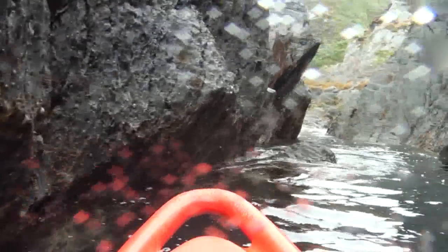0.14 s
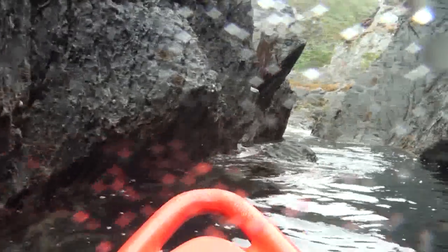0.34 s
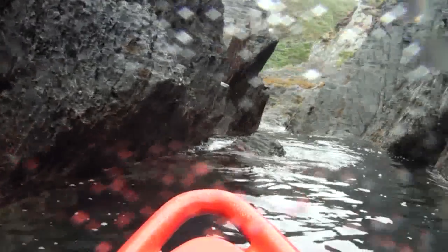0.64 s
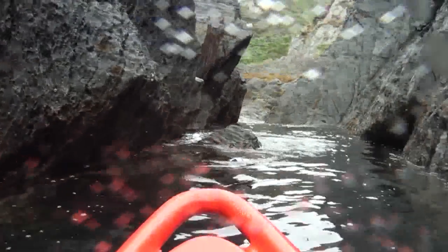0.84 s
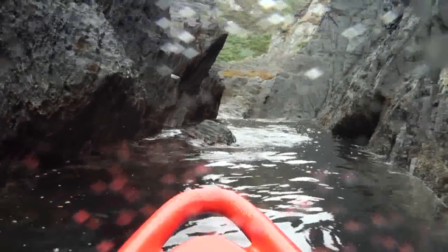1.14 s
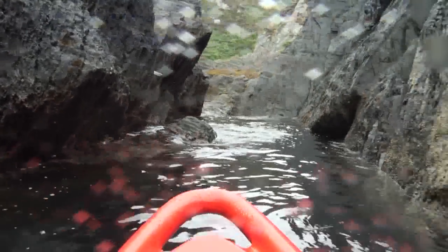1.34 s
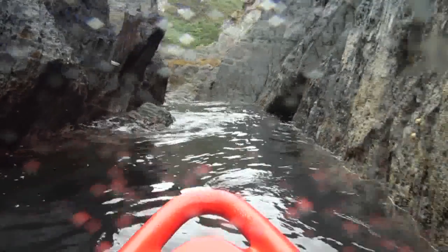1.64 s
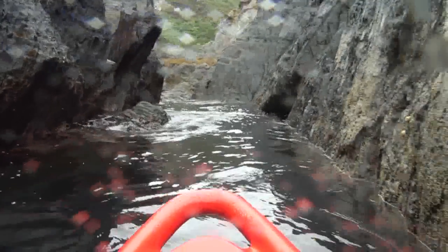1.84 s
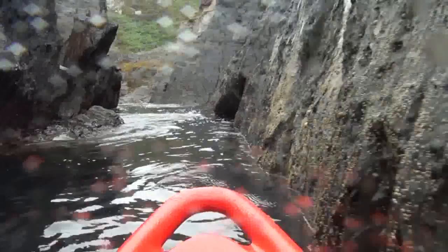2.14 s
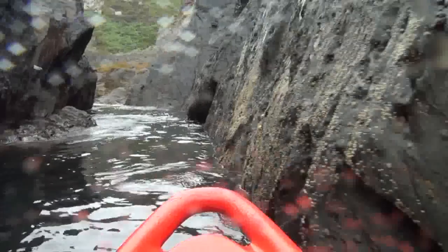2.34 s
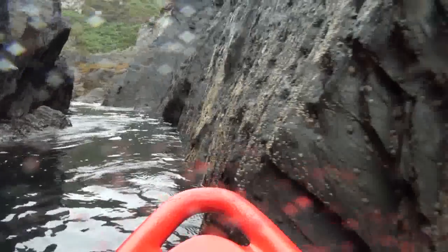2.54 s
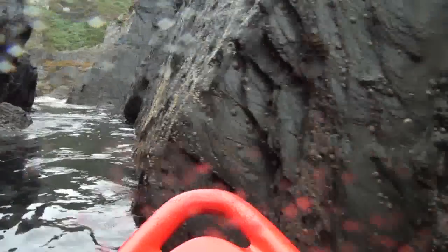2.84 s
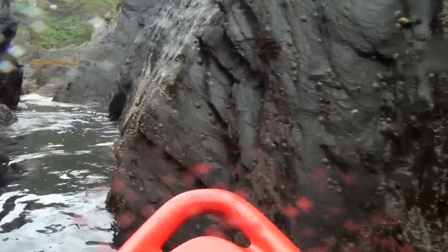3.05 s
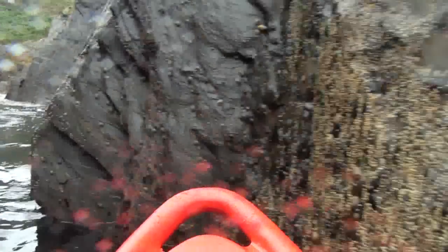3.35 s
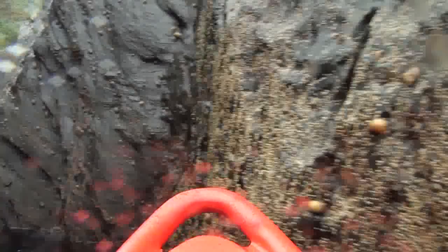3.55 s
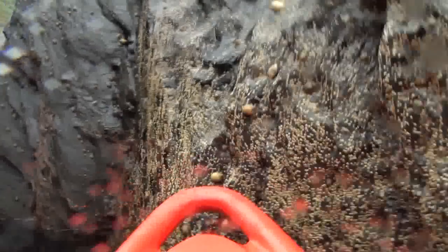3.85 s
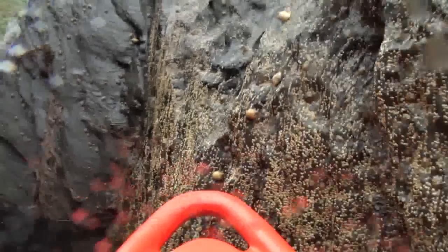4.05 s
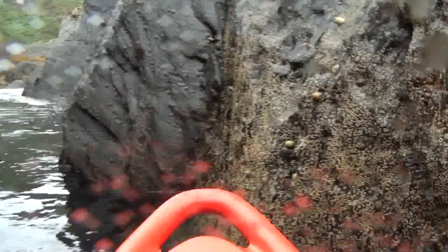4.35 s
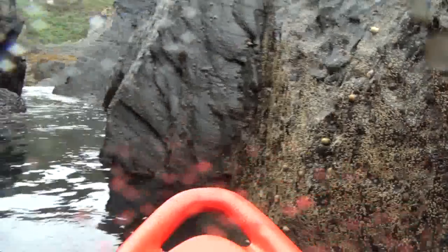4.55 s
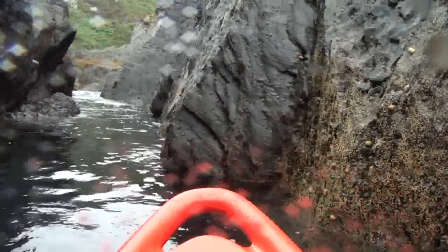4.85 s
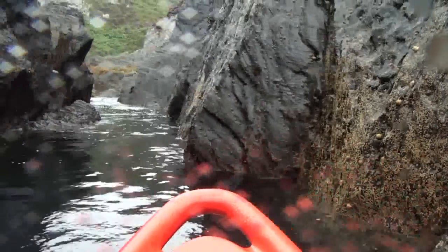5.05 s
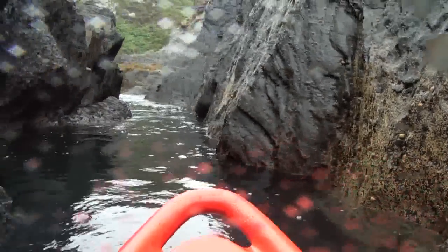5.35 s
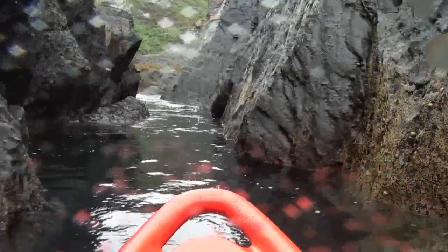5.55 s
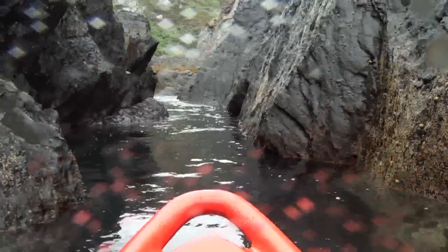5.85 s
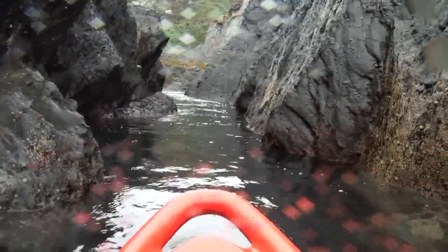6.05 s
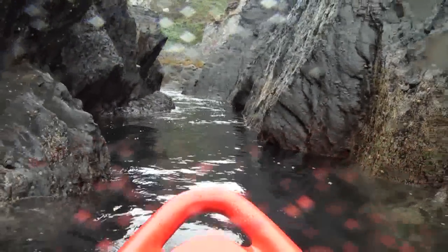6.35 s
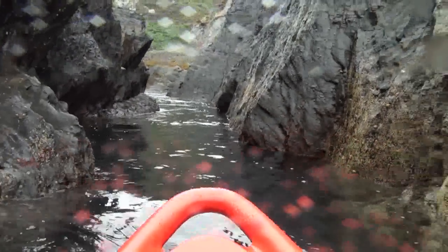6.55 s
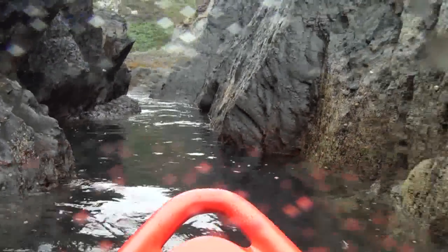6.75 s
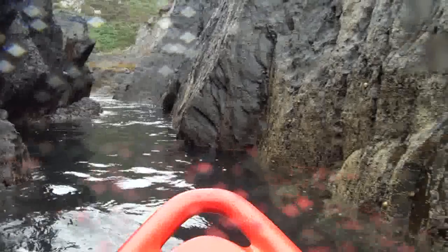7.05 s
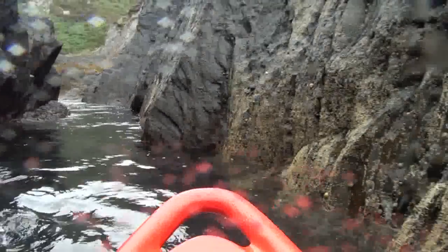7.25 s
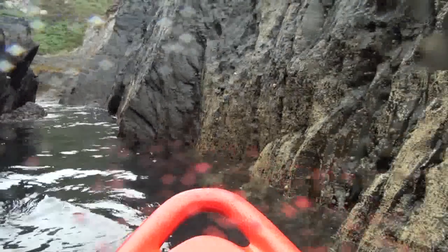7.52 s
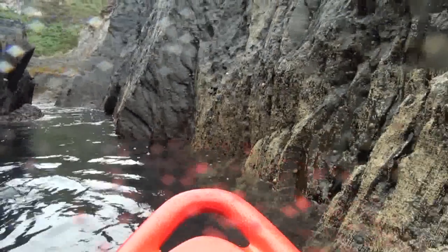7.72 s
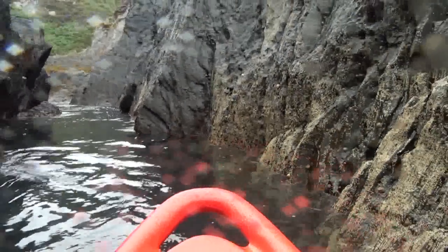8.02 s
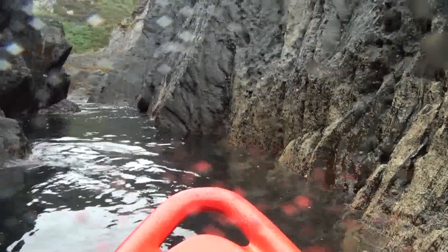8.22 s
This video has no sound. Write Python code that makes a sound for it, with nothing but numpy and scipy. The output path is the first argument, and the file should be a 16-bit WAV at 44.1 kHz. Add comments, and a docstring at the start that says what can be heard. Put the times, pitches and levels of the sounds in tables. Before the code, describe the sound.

Heard from a sealed case on the deck of a plastic kayak in a narrow rock gully, everything is close, dull and boxy, with faint hiss. It opens with churned water, a sharp drop and quick paddle knocks, fading by about 0.5 s into lapping. Light knocks and a small fizzing swash come near 1.3-1.6 s, then soft gurgles around 2 s and a few taps at 2.75-3.05 s. At 3.83 s the hull strikes rock: a loud deep boom, a surge, and a clatter of blunt knocks until 4.25 s. Bubbling gurgles and high plinks run to about 5 s, then ease. A flurry of hard, hollow paddle knocks rattles from 5.67 to 6.04 s. Water stays calm, with faint ticks, until a small gurgle near 7.8 s. From 8.06 s, water rushes up and the hull bumps rock with several low booms before the end.

```python
"""A plastic kayak drifts in a narrow rock gully, heard by two microphones in a sealed case on its deck.
It starts with churned water and paddle knocks, then shaped noise and gliding sines wash and gurgle.
Near 3.8 s rock hits with a deep hull boom and a surge: noise cracks and booms, fading sines ring.
Gurgles follow, a flurry of paddle knocks near 6 s, a calmer spell, then rock and hull booms after 8 s.
Drops tick on the case throughout; the case muffles everything and rings differently at each microphone."""
import sys
import numpy as np
from scipy import signal
from scipy.fft import rfft, irfft, next_fast_len
from scipy.io import wavfile
from scipy.ndimage import uniform_filter1d, map_coordinates

SR = 44100
rng = np.random.default_rng(int(sys.argv[2]) if len(sys.argv) > 2 else 0)


def store_pcm(level_fs):
    """Save levels as 16-bit WAV."""
    pcm = np.round(np.clip(level_fs, -1, 1) * 32767).astype(np.int16)
    wavfile.write(sys.argv[1], SR, np.atleast_2d(pcm).T)


N = 369554  # samples


def amp(db):
    """Turn decibels into gain."""
    return 10 ** (np.asarray(db) / 20)


def unit(x):
    """Scale x to an rms (average strength) of 1."""
    return x / np.sqrt(np.mean(x ** 2) + 1e-20)


def along(points, hz):
    """Read a value at each pitch from (Hz, value) points, joined on a log pitch axis."""
    point_hz, value = np.transpose(points)
    return np.interp(np.log(hz + 1), np.log(point_hz + 1), value)


def filtered(x, response):
    """Filter x with a response given as a function of frequency."""
    size = 2 * next_fast_len(N // 2 + SR // 4)  # spare room, so the tail does not wrap round
    spectrum = rfft(x, size) * response(np.fft.rfftfreq(size, 1 / SR))
    return irfft(spectrum, size)[..., :N]


def high_pass(hz, corner_hz):
    """A two-stage filter that lets through what lies above the corner."""
    return (1j * hz / (corner_hz + 1j * hz)) ** 2


def low_pass(hz, corner_hz):
    """A two-stage filter that lets through what lies below the corner."""
    return 1 / (1 + 1j * hz / corner_hz) ** 2


def causal(db):
    """A minimum-phase filter with these decibels: it answers as early as it can, never beforehand."""
    cepstrum = irfft(np.log(amp(db)))
    fold = np.r_[1, np.full(len(db) - 2, 2), 1]
    return np.exp(rfft(cepstrum[:len(db)] * fold, len(cepstrum)))


def modes(table, hz):
    """A sum of resonances, scaled to keep the power of white noise."""
    ring = sum(amp(db) * 1j * hz * width / (centre ** 2 - hz ** 2 + 1j * hz * width)
               for centre, width, db in table)
    return ring / np.sqrt(np.mean(abs(ring) ** 2))


def patchy(spectrum, patchy_db, hz_bins, frames):
    """Two noises of rms 1 whose strength varies together, in random patches of pitch and time."""
    noise = signal.stft(rng.standard_normal((2, N)), nperseg=512)[2]
    field = uniform_filter1d(rng.standard_normal(noise.shape[1:]), hz_bins, 0)
    field = unit(uniform_filter1d(field, frames, 1))
    pair = signal.istft(noise * amp(patchy_db * field), nperseg=512)[1][:, :N]
    closed = [(1, -120)] + spectrum + [(SR / 2, -120)]  # silent at both ends of the band
    return unit(filtered(pair, lambda hz: amp(along(closed, hz))))


def chirps(start, first_hz, last_hz, db, length):
    """Gliding sines with a quick swell and a slower fade; each path has its own phase."""
    out = np.zeros((2, N + SR))
    # the water surface is never still
    flutter = 1 + 0.38 * unit(uniform_filter1d(rng.standard_normal(N + SR), 70))
    phases = rng.uniform(0, 2 * np.pi, (len(start), 2))
    for s, first, last, level, life, phase in zip(start, first_hz, last_hz, db, length, phases):
        at = round(s * SR)
        u = np.arange(round(life * SR)) / (life * SR)  # 0 to 1 through the life
        turn = 2 * np.pi * life * (first * u + (last - first) * u * u / 2)
        swell = np.sin(np.pi * u ** 0.54) ** 0.81
        tone = swell * np.sin(turn + phase[:, None]) * flutter[at:][:len(u)]
        out[:, at:][:, :len(u)] += amp(level) * tone
    return out[:, :N]


def curves(rows):
    """Join the rows into one value per sample for each column after the time."""
    s, *columns = np.transpose(rows)
    return [np.interp(np.arange(N) / SR, s, column) for column in columns]


def levels_db():
    """Slosh, ripple, fizz and rumble levels: open water plus surges that rise, hold and fade."""
    # open water between surges: (time [s], ripple level [dB], fizz level [dB], rumble level [dB])
    open_water = [(0, -31.5, -26, -30), (.5, -36, -30.5, -46), (.88, -38, -31, -59.5),
                  (1.4, -34, -22, -45.5), (1.58, -37.5, -28, -49.5), (1.7, -40.5, -37, -57.5),
                  (2.3, -40.5, -35, -62), (2.7, -37.5, -32.5, -66), (2.86, -34.5, -28, -72),
                  (3.15, -37.5, -32, -61.5), (3.7, -39.5, -35.5, -43), (4.2, -36, -34, -47),
                  (4.55, -31, -25.5, -61), (4.9, -36, -25.5, -65), (5.2, -41.5, -37, -56),
                  (5.85, -42, -35.5, -57), (6.4, -47.5, -44, -54), (6.75, -42.5, -35.5, -62),
                  (6.88, -45, -27.5, -71), (7, -42, -39, -61.5), (7.5, -44, -34, -48),
                  (7.72, -43.5, -37.5, -60), (8.0, -32, -29.5, -62), (8.38, -29, -25, -40)]
    # surges churned up by a stroke or a bump:
    # (time [s], slosh level [dB], ripple level [dB], fizz level [dB], rumble level [dB])
    surges = [(0, -36, -23.5, -20.5, -43.5), (3.838, -25.5, -23.5, -47, -23.5), (5.9, -47.5, -38, -27, -76),
              (8.12, -41, -31.5, -32.5, -54)]
    # how fast a surge dies: slosh, ripple, fizz, rumble [dB per s]
    fade_rates = [37.7, 41.5, 40, 51]
    rise_s, hold_s = 0.085, 0.048
    ripple, fizz, rumble = curves(open_water)
    slosh = ripple - 7  # dB
    gains, t = amp([slosh, ripple, fizz, rumble]), np.arange(N) / SR
    for s, *peak_db in surges:
        fade_db = np.outer(fade_rates, np.maximum(t - s - rise_s - hold_s, 0))
        rise = np.clip((t - s) / rise_s, 0, 1)
        gains = np.hypot(gains, rise * amp(np.c_[peak_db] - fade_db))  # powers add
    return 20 * np.log10(gains)


def laps():
    """Slosh and ripple gains of wavelets lapping the hull, each a smooth swell."""
    # (time [s], slosh level [dB], ripple level [dB], length [s])
    wavelets = [(0.31, -46, -28, 0.075), (1.325, -45, -29.5, 0.072), (1.558, -39, -31.5, 0.054),
                (1.939, -56, -39.5, 0.049), (2.032, -36, -46, 0.087), (2.422, -65, -35.5, 0.05),
                (3.022, -65, -38, 0.079), (3.641, -32, -82, 0.084), (4.239, -38, -30, 0.05),
                (4.333, -46, -30.5, 0.12), (4.627, -80, -33, 0.15), (6.782, -49.5, -32, 0.051),
                (7.473, -72, -38, 0.066), (7.78, -48, -44, 0.041), (8.081, -42, -21, 0.095),
                (8.344, -40, -22, 0.015)]
    out = np.zeros((2, N + SR))
    for s, slosh_db, ripple_db, length in wavelets:
        swell = np.sin(np.pi * np.linspace(0, 1, round(length * SR)) ** 0.62)
        out[:, round(s * SR):][:, :len(swell)] += amp([[slosh_db], [ripple_db]]) * swell
    return out[:, :N]


def bubbles(bed_db, low_hz, spread, cycles, count):
    """A crowd of bubbles riding on a wash; a rising bubble climbs in pitch."""
    when, size, pitch = rng.random((count, 3)).T
    at = (when * (N - 1)).astype(int)
    hz = low_hz * spread ** pitch
    size_db = -3 * np.log(1 - 0.95 * size)  # many faint, few loud
    return chirps(at / SR, hz, 1.28 * hz, bed_db[at] + size_db, cycles / hz)


def water():
    """Four washes of noise, with bubbles, low gulps, crackle and tiny droplets riding on them."""
    # noise colour of each wash: (frequency [Hz], relative density [dB per Hz])
    rumble_colour = [(15, -30.5), (35, -1), (80, 1), (140, -1), (300, -15.5)]
    slosh_colour = [(60, -38), (140, -5.5), (300, 2.5), (600, -2.5), (1200, -26)]
    ripple_colour = [(250, -32), (700, 2), (2800, 1.5), (4200, -8.5), (6000, -8.5)]
    fizz_colour = [(3000, -0.5), (4500, 6.5), (9000, 4.5), (16000, -24)]
    slosh, ripple, fizz, rumble = levels_db()
    lap_slosh, lap_ripple = laps()
    # the wash breaks into slaps and gaps, deeper for each dB of ripple over calm
    calm_db, chop_depth = -47.5, 0.1747
    slaps = map_coordinates(rng.standard_normal(400), [np.linspace(0, 399, N)])
    chop_db = chop_depth * np.clip(ripple - calm_db, 0, 15) * slaps
    slosh_gain = amp(slosh + chop_db) + lap_slosh
    ripple_gain = amp(ripple + chop_db) + lap_ripple
    wash = amp(rumble) * patchy(rumble_colour, patchy_db=-2.5, hz_bins=2, frames=6)
    wash += slosh_gain * patchy(slosh_colour, patchy_db=4.5, hz_bins=2, frames=4)
    wash += ripple_gain * patchy(ripple_colour, patchy_db=2.0, hz_bins=8, frames=3)
    wash += amp(fizz) * patchy(fizz_colour, patchy_db=2.0, hz_bins=40, frames=3)
    # bubbles that stand out more in busy water
    wash += bubbles(1.386 * ripple + 1.2, low_hz=331.8, spread=7.2, cycles=9.1, count=700)
    # low gulps
    wash += bubbles(0.89 * slosh - 10, low_hz=172, spread=4.29, cycles=14.6, count=80)
    # crackle: under two cycles each
    wash += bubbles(1.16 * ripple + 3, low_hz=646, spread=7.2, cycles=1.77, count=900)
    # tiny droplets in the froth
    wash += bubbles(fizz - 5.5, low_hz=2463, spread=4.2, cycles=20.0, count=250)
    return wash


def gurgles_and_hull_booms():
    """Gurgles, plinks and deep hull booms: each a gliding sine."""
    # the clearest gurgles, plinks and hull booms:
    # (time [s], first pitch [Hz], last pitch [Hz], level [dB])
    glides = [(0.214, 148.4, 168, -24), (0.239, 185, 164, -21), (0.376, 326, 340, -27.5),
              (.343, 374, 340, -28), (.452, 544, 580, -31), (.47, 329, 303, -34.5), (.721, 560, 780, -35.5),
              (.953, 904, 780, -32.5), (1.162, 117, 102, -35), (1.453, 1264, 1206, -28.5),
              (1.646, 450, 550, -39), (1.766, 410, 530, -41), (1.8, 614, 930, -40), (1.931, 306, 380, -37),
              (2.291, 390, 445, -37), (1.915, 483, 1020, -44), (2.04, 403, 480, -43),
              (2.052, 213, 159, -37), (2.253, 914, 1044, -29), (2.324, 358, 550, -31.5),
              (2.35, 537, 770, -36.5), (2.448, 195, 165, -33.5), (2.517, 417, 410, -38),
              (2.529, 733, 680, -33.5), (2.602, 288, 180, -35.5), (3.575, 513, 530, -36),
              (3.659, 471, 472, -33.5), (3.662, 281, 280, -33), (3.834, 159, 156, -6),
              (3.93, 1560, 1580, -20), (4.064, 378, 422, -26), (4.094, 1320, 1330, -27),
              (4.195, 678, 685, -24), (4.259, 1263, 1500, -17.5), (4.26, 267, 267, -27.5),
              (4.341, 978, 740, -27), (4.38, 712, 684, -21), (4.403, 506, 487, -28.5),
              (4.541, 465, 540, -31), (4.55, 1446, 1370, -24), (4.612, 664, 955, -28),
              (4.645, 2480, 2650, -21), (4.682, 1080, 1109, -27.5), (4.756, 775, 960, -32),
              (4.836, 3410, 3720, -16), (4.865, 278, 306, -31), (4.898, 304, 317, -33.5),
              (4.939, 295, 335, -35.5), (4.985, 335, 485, -37), (5.045, 605, 870, -38),
              (5.149, 367, 475, -39.5), (5.185, 695, 830, -38.5), (5.257, 1430, 1400, -35.5),
              (5.57, 2295, 2450, -34.5), (5.974, 2600, 2430, -14.5), (7.753, 424, 506, -41.5),
              (7.784, 630, 630, -35), (7.824, 730, 790, -34), (7.82, 1496, 1340, -23),
              (7.823, 220, 266, -32.5), (7.847, 490, 625, -24), (7.926, 475, 547, -37),
              (8.12, 451, 327, -24.5), (8.187, 342, 256, -18.5), (8.215, 313.6, 223, -19),
              (8.255, 208, 166, -17)]
    s, first_hz, last_hz, db = np.transpose(glides)
    octaves = abs(np.log2(last_hz / first_hz))
    life = 0.027 * (500 / first_hz) ** 0.28  # seconds; higher ones end sooner
    return chirps(s, first_hz, last_hz, db, life * (1 + 1.2 * octaves))  # wide glides last


def spray():
    """Drops striking the case wall directly: each is a short rough tick round its own pitch."""
    # (time [s], level before the lift [dB], time to fall 60 dB [s], pitch [Hz])
    drops = [(0.0811, -15, 0.063, 5796), (1.9515, -52, 0.073, 5640), (1.98, -45, 0.056, 5800),
             (2.238, -47, 0.047, 4730), (2.4243, -49, 0.04, 6800), (2.7506, -27.5, 0.1, 5750),
             (2.7744, -33, 0.078, 5850), (2.8431, -29, 0.051, 6000), (3.052, -48, 0.032, 5520),
             (3.2794, -54, 0.051, 5700), (3.643, -51, 0.064, 6760), (3.8434, -29, 0.053, 5640),
             (3.8648, -44, 0.025, 4570), (4.47, -39, 0.034, 5840), (4.8247, -36, 0.028, 5930),
             (4.9036, -35, 0.029, 5550), (4.954, -38, 0.036, 6140), (4.9794, -39, 0.057, 5270),
             (5.1516, -45, 0.042, 4820), (5.539, -42, 0.036, 5710), (5.7798, -53, 0.04, 5770),
             (6.0126, -19, 0.029, 4590), (6.3253, -44.5, 0.042, 5630), (6.4564, -51, 0.056, 5360),
             (6.5986, -45.5, 0.057, 5630), (6.7178, -38.5, 0.029, 7060), (6.85, -52, 0.04, 6460),
             (7.5205, -44, 0.11, 6600), (7.7882, -48, 0.073, 6200), (7.9882, -49, 0.034, 5960),
             (8.1055, -25, 0.076, 5730), (8.1926, -31, 0.05, 5400), (8.224, -49, 0.025, 5840),
             (8.2893, -30, 0.024, 6070)]
    lift_db = 28.5
    out, t = np.zeros((2, N + SR)), np.arange(SR // 8) / SR
    for s, db, t60, hz in drops:
        rough = unit(uniform_filter1d(rng.standard_normal((2, len(t))), size=6))
        tick = rough * np.sin(2 * np.pi * hz * t)
        out[:, round(s * SR):][:, :len(t)] += amp(db + lift_db - 60 * t / t60) * tick
    return filtered(out[:, :N], lambda hz: high_pass(hz, 2500))


def knocks(blows, t60, edge_db):
    """Each blow is a shove and dying noise that crack and boom, while fading sines ring the shell."""
    # boom of the hull: (pitch [Hz], width [Hz], relative level [dB])
    hull_modes = [(193, 34, -1), (234.6, 13, 2.5), (306, 66, -1), (490, 470, -20)]
    # ring of the shell: (pitch [Hz], relative level [dB], fall time before scaling by t60 [s])
    shell_modes = [(753, -4.5, 0.068), (993, -4.5, 0.069), (1219.6, -10.5, 0.075), (1360, -3, 0.06),
                   (1448, -8, 0.08), (1700, 0, 0.066)]
    mode_hz, mode_db, mode_t60 = np.transpose(shell_modes)[:, :, None]
    t = np.arange(SR // 8) / SR
    burst, shove = np.zeros((3, N + SR)), np.zeros((3, 2, N))  # rows: crack, boom, edge
    ring = np.zeros((2, N + SR))
    slowness = np.array([0.8, 1.3, 0.5])  # the edge is gone first
    quarter_turn = np.array([0, np.pi / 2])[:, None, None]  # ring reaches the second path out of step
    for s, db, ring_db, boom_db, spot_hz in blows:
        at, far_path = round(s * SR), [1, rng.normal(0, 0.59)]
        levels = np.array([db + 8.5, boom_db - 12.0, db + edge_db + 33.0])
        burst[:, at:][:, :len(t)] += amp(levels[:, None] - 60 * t / (t60 * slowness[:, None]))
        shove[:, :, at] = amp(levels + [12, 28, 8])[:, None] * far_path
        # the spot that is struck favours the modes near one pitch
        share_db = mode_db - 22 * abs(np.log2(mode_hz / spot_hz)) + rng.normal(0, 2.06, mode_hz.shape)
        # the contact chatters
        unsteady = uniform_filter1d(rng.standard_normal((len(mode_hz), len(t))), 90)
        chatter = 1 + 0.81 * unit(unsteady)
        swell = 1 - np.exp(-t / 0.0012)
        tones = amp(share_db - 60 * t / (mode_t60 * t60 / 0.066)) * chatter * swell
        sines = np.sin(2 * np.pi * mode_hz * t + quarter_turn)
        ring[:, at:][:, :len(t)] += amp(ring_db - 0.5) * np.sum(tones * sines, axis=1)
    crack, boom, edge = burst[:, None, :N] * rng.standard_normal((3, 2, N)) + shove
    crack = filtered(crack, lambda hz: high_pass(hz, 1370) * low_pass(hz, 5000))
    edge = filtered(edge, lambda hz: high_pass(hz, 3700))
    # the hull takes a blow as a blunt push
    boom = filtered(boom, lambda hz: modes(hull_modes, hz) * high_pass(hz, 99) * low_pass(hz, 700))
    return crack + edge + ring[:, :N] + boom


def paddle():
    """The paddle knocks the deck; the floating hull rings on."""
    # levels are relative: (time [s], crack level [dB], shell ring level [dB], hull boom level [dB],
    # favoured ring pitch [Hz])
    paddle_blows = [(.0574, -1.5, -15, -31, 1130), (.0832, 1.5, -7.5, -40, 1310),
                    (.1404, -32, -8.5, -22, 870), (.3084, -12.5, -23, -29, 1500),
                    (.3204, -14.5, -30, -37, 1220), (.613, -22, -46, -53, 1050),
                    (1.324, -21, -12.5, -24, 1110), (1.348, -29, -48, -23, 1280),
                    (1.452, -18.5, -29, -29, 1230), (1.5478, -12, -45, -60, 1410),
                    (1.5734, -22.5, -22, -32, 1400), (2.7535, -12.5, -16, -15.5, 1470),
                    (2.8453, -18.5, -24, -25, 1080), (3.0512, -16.5, -28, -43, 1020),
                    (5.0699, -21, -46, -52, 1020), (5.668, -8.5, -9, -7.5, 1160),
                    (5.7457, -42, -26, -20.5, 1160), (5.8309, -19, -11, -26.5, 1140),
                    (5.8622, -8.5, -10.5, -19, 1210), (5.903, -8.5, -16, -22.5, 1330),
                    (5.9312, -14, -12, -35, 1350), (5.9625, -14, -10, -11, 1240),
                    (5.976, -7, -43, -16.5, 1250), (6.0027, -7.5, -27, -16.5, 1500),
                    (6.0123, -5.5, -2.5, -47, 1520), (6.0216, -10.5, -6, -69, 910),
                    (6.0397, -24, -20.5, -52, 1030), (7.4033, -28.5, -33, -32, 1310),
                    (7.7971, -24, -41, -35, 1460), (8.108, -9, -10.5, -37, 724),
                    (8.289, -21, -55, -32, 870)]
    return knocks(paddle_blows, t60=0.079, edge_db=-28)


def rock():
    """The hull grounds on rock, which damps it; the contact is blunt, so it has less edge."""
    # levels are relative: (time [s], crack level [dB], shell ring level [dB], hull boom level [dB],
    # favoured ring pitch [Hz])
    rock_blows = [(3.833, -5, -4.5, 2, 905), (3.8437, 0, 5.5, -4, 710), (3.8684, -1.5, -11, -6, 1170),
                  (3.8804, -12, -11, -11, 1280), (3.9086, -10, -19, -9, 700), (3.9437, -10, -27, -21, 990),
                  (3.9636, -3, -4.5, -26, 845), (3.9778, 1.5, -4.5, -9.5, 694),
                  (3.9895, -23, -6.5, -38, 1620), (4.0138, 0, -14, -43, 1520),
                  (4.0763, -38, -11, -25, 1325), (4.1116, -5.5, -10.5, -28, 800),
                  (4.1321, -47, -22, -6.5, 1120), (4.1752, -7, -11, -37, 760),
                  (4.2385, -7.5, -14.5, -33, 770), (8.0612, -1.5, -2, -16, 1350),
                  (8.1872, -10.5, -14, 4.5, 835), (8.2112, -10.5, 0.5, 1.5, 1400),
                  (8.2245, 0.5, -12, 0, 1040), (8.2362, -2.5, 0.5, -1, 990), (8.2583, -12, -14, -1, 1230),
                  (8.3438, -23, -12.5, -42, 1220)]
    return knocks(rock_blows, t60=0.041, edge_db=-42)


def scene():
    """Two paths to the case, blended so that left and right are as alike as the case allows."""
    # likeness of the two microphones: (frequency [Hz], likeness [-1 to 1])
    # the case walls flex in opposition through the low treble
    likeness = [(50, 0.32), (170, 0.92), (1300, 0.76), (2000, 0.23), (2900, -0.51), (4200, -0.16),
                (6000, -0.15), (7000, 0.42), (11000, 0.071)]
    paths = water() + gurgles_and_hull_booms() + spray() + paddle() + rock()

    def blend(hz):
        angle = np.arccos(np.clip(along(likeness, hz), -1, 1)) / 2
        return np.array([np.cos(angle), np.sin(angle)])

    mid, side = filtered(paths, blend)
    return np.array([mid + side, mid - side])


def record(dry):
    """The case colours each microphone, hiss is added, loud peaks round off and the top is cut."""
    # the case at each microphone: (frequency [Hz], level [dB])
    case_left = [(1300, 0), (1600, -5), (2000, -6.5), (2450, 3), (2950, -16), (3250, -13), (3600, -9),
                 (4300, -29.5), (4800, -28), (5850, -18), (6700, -27.5), (7700, -35.5), (9600, -43.5),
                 (15000, -50)]
    case_right = [(1300, -0.5), (1600, -6), (1900, -9), (2300, -5), (2650, -8.5), (3300, -15), (3600, -18),
                  (4300, -27.5), (4800, -27), (5700, -30.5), (6700, -26.5), (7700, -41.5), (9600, -42.5),
                  (15000, -49)]
    top_hz = 15800
    cased = filtered(dry, lambda hz: np.array([causal(along(case_left, hz)),
                                               causal(along(case_right, hz))]))
    cased = cased + amp(-75) * rng.standard_normal(dry.shape)  # each microphone has its own hiss
    rounded = cased / (1 + abs(cased) ** 6) ** (1 / 6)
    return filtered(rounded, lambda hz: hz < top_hz)


dry = scene()
out = record(dry)
store_pcm(out)
```